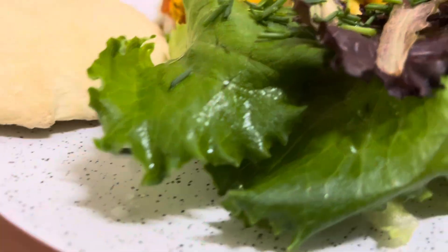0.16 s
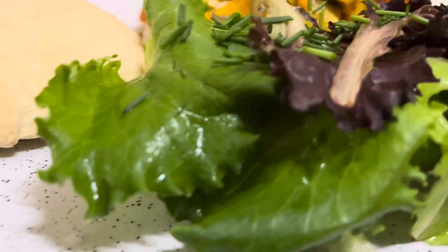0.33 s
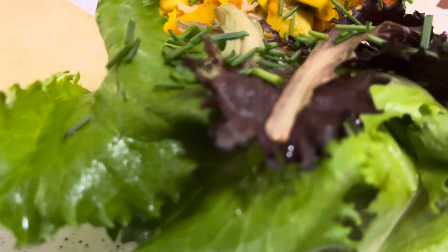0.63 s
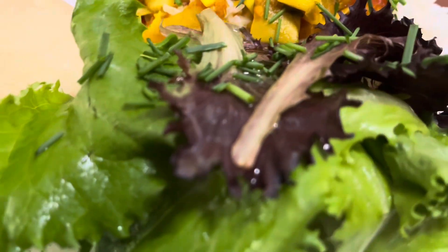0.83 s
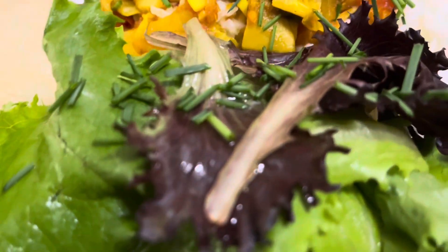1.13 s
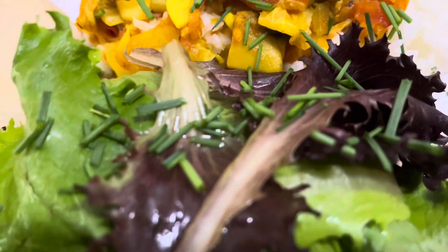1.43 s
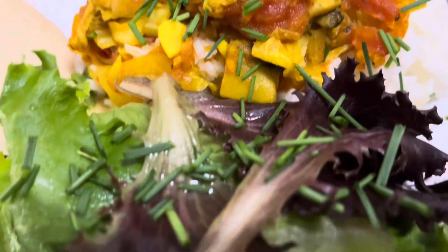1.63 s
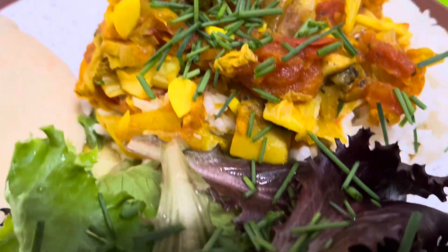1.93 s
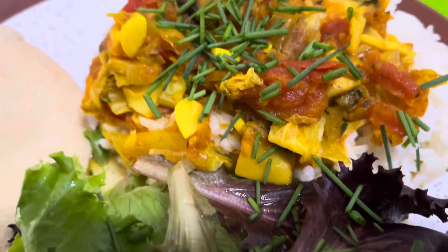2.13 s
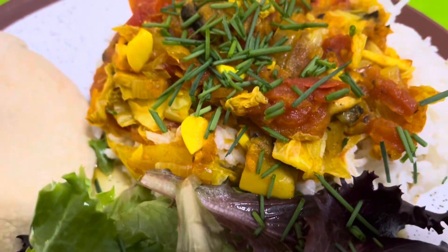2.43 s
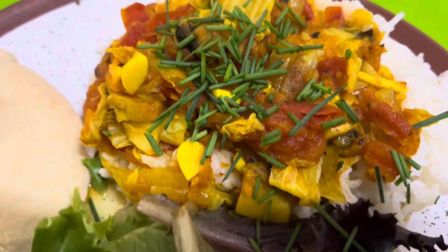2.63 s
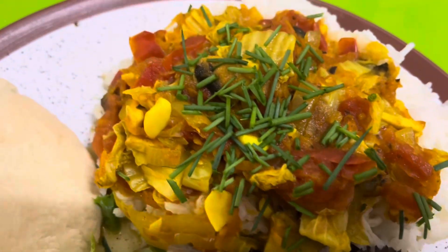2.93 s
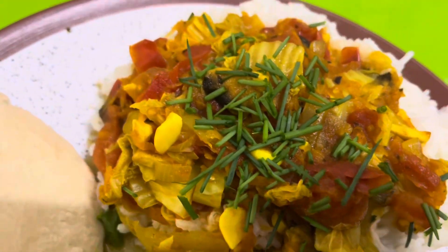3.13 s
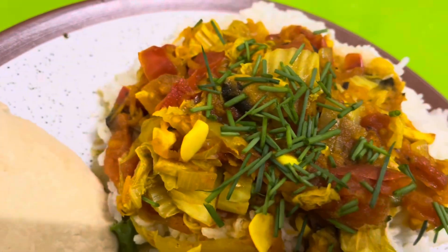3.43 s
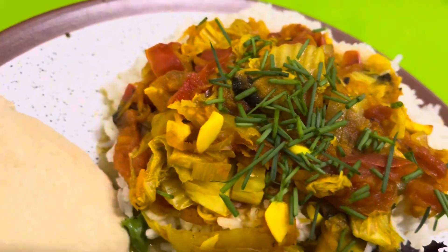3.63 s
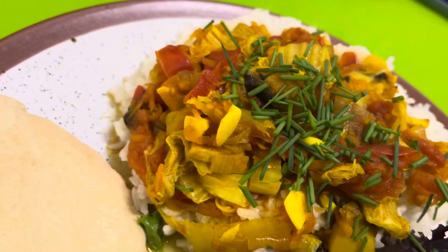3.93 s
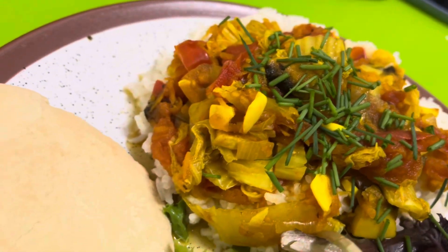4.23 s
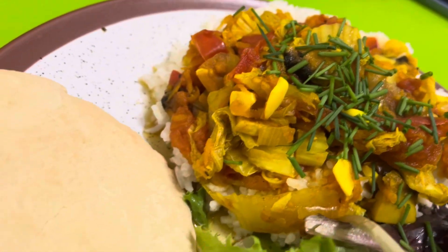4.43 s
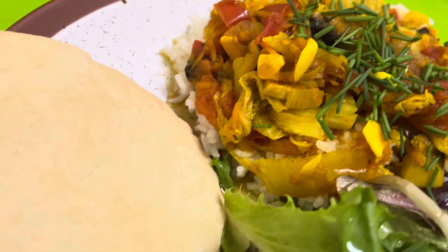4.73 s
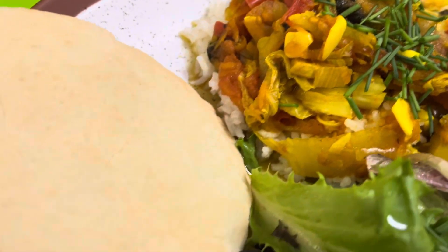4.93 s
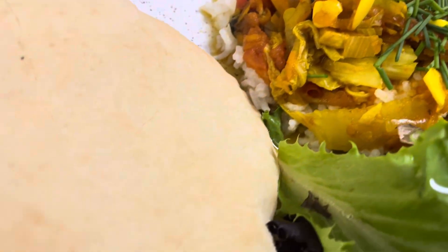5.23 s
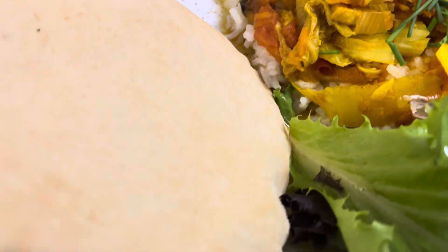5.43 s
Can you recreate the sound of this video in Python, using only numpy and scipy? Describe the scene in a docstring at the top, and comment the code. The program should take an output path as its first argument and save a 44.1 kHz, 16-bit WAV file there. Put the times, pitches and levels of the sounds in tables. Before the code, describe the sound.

Cutlery taps and dully knocks on china at irregular intervals, with one brief squeak across the glaze, over low steady room rumble and hiss.

```python
"""At a table in a small furnished room, cutlery meets china a little way from two microphone ports.
Taps excite the damped modes of a plate, and duller knocks those of a bowl, each with a noise burst.
Once an edge squeaks across the glaze by stick-slip, a harmonic series with lines at halves and quarters.
Diffuse echoes carry each sound for about a quarter second over a steady rumble and hiss of shaped noise."""
import sys
import numpy as np
from scipy import signal
from scipy.fft import rfft, irfft, next_fast_len
from scipy.io import wavfile
from scipy.ndimage import uniform_filter1d

SR = 44100
rng = np.random.default_rng(int(sys.argv[2]) if len(sys.argv) > 2 else 0)


def digitize_waveform(pressure):
    """Quantize a signal to 16-bit integers and store it at the path in sys.argv[1].

    Rows of a 2-D input are taken as channels; values are limited to [-1, 1].
    """
    field = np.atleast_2d(pressure).T
    bounded = np.clip(field, -1, 1)
    quanta = np.round(bounded * 32767).astype(np.int16)
    wavfile.write(sys.argv[1], SR, quanta)


N = 245501
SPAN = 20480  # samples given to each sound with its echoes

# Steady noise of the room, as the sum of the ports. Each row: frequency in Hz, relative density in dB.
HUM_SPECTRUM = [(12, -34), (20, -13.5), (65, 0), (210, -9), (301, -11), (422, -16.5), (558, -16.5),
                (897, -23), (1220, -29), (1440, -32.5), (5380, -44), (7730, -59), (8650, -67.5),
                (12100, -53.5), (16000, -100.5)]
# The same as the difference of the ports. Each row: frequency in Hz, relative density in dB.
WIDE_SPECTRUM = [(12, -36), (20, -10), (187, -7), (228, -3), (328, -4), (377, -2), (949, -6.5),
                 (1610, -13.5), (1810, -23), (4060, -26.5), (6720, -36.5), (7730, -27), (16000, -85.5)]
HUM_DB, WIDE_DB = -45, -54.5  # rms levels of sum and difference

# Decay of the room's echoes. Each row: frequency in Hz, time to fall 60 dB in seconds.
ROOM_T60 = [(500, 0.29), (2000, 0.25), (6000, 0.21), (14000, 0.16)]
# How alike the ports hear echoes. Each row: frequency in Hz, correlation from -1 to 1.
LIKENESS = [(100, -0.16), (300, .7), (640, 0.29), (1400, -0.093), (3000, 0.51), (6800, -0.6), (10000, 0.67),
            (15000, 0.13)]
BUILD_S, EARLY_DB, EARLY_T60_S = .003, 5.5, 0.094  # onset of the echoes; extra early part and its decay
EVEN_HZ = 30  # width of the stretches brought to equal energy
DIRECT_DB, WET_DB = -16.5, 3  # straight path and room, for taps and knocks

# Modes rung by the knocks. Each row: frequency in Hz, relative level in dB, free 60 dB decay in seconds.
BOWL_MODES = [(767, -12, 0.19), (1348, -1.5, 0.095), (1608, -5.5, 0.14), (1690, 4.5, 0.047),
              (1762, 4.5, 0.042), (2980, 3.5, 0.014), (4460, -6, 0.024)]
# Spectrum of contact noise. Each row: frequency in Hz, relative level in dB.
CRACK_SPECTRUM = [(300, -11.5), (800, -11), (1600, -8), (3000, -8), (5500, -5.5), (7500, -14.5),
                  (11000, -15.5), (13500, -26), (15500, -45.5)]
# Knocks, placed BUILD_S early. Each row: time in seconds, crack level in dB, left minus right in dB,
# ring level in dB, contact time in seconds, crack tilt in dB per octave.
KNOCKS = [(0.427, -29, 3, -45.5, 0.0082, -10.5), (1.365, -33, 5, -50, 0.0023, -4),
          (4.869, -11, 3, -24.5, 0.0029, -1.5), (4.895, -20, -1, -35, 0.0048, -4),
          (5.284, -31, 2, -50, 0.0041, -10.5)]
PUSH_S = 0.00032  # time constant with which a blow sets the china ringing

# Modes of the plate. Each row: frequency in Hz, relative level in dB, free 60 dB decay in seconds.
PLATE_MODES = [(1130, 3, 0.18), (1044, 5, 0.026), (1414, -3, 0.026), (1469, -3, 0.069), (1815, -0.5, 0.026),
               (1826, 0.5, 0.0494), (1890, 2.5, 0.028), (2290, -7, 0.035), (2834, 3, 0.04),
               (2901, 4.5, 0.056), (3014, -2, 0.053), (3490, 5.5, 0.019), (3620, 2.5, 0.019),
               (4120, -12, 0.03), (5070, -3.5, 0.067), (5146, 7, 0.079), (5154, -3.5, .04),
               (6500, -22, .04), (8130, -9, 0.12), (9350, -4.5, 0.018), (9900, -12, 0.046),
               (11030, 6.5, 0.036), (11190, -8.5, 0.15), (12670, -9, .05), (13350, -12, .04),
               (14650, -11, 0.0426)]
# How strongly a blow drives the plate, by named spot. Each row: frequency in Hz, relative level in dB.
SPOT_DRIVES = {"rim": [(1120, -1), (1400, -25.5), (1880, 0.5), (2850, 0.5), (3640, 2.5), (5100, -0.5),
               (11000, 1.5)], "edge": [(1120, -1.5), (1400, -10.5), (1880, -4), (2850, -7), (3640, -16),
               (5100, -4.5), (11000, -8.5)], "middle": [(1120, -22), (1400, 0), (1880, -34), (2850, -16),
               (3640, -37), (5100, -22), (11000, -42)]}
# Taps, placed BUILD_S early. Each row: time in seconds, spot struck, crack level in dB, ring level in dB,
# left minus right in dB, ring length as a share of the free plate's, treble tilt in dB per octave
# above TILT_HZ, extra level in dB of the glassy ring around GLASSY_HZ.
TAPS = [(0.929, "rim", -21.5, -35.5, 3, 0.83, 0.77, 3), (2.292, "rim", -15.5, -36, 2.5, 1.2, 0.1, 1),
        (2.663, "edge", -13.5, -40.5, 2.5, 1.66, 0.7, .3), (2.750, "edge", -13.5, -34.5, 1.5, 0.87, 1, -2),
        (3.314, "middle", -24, -20, -.3, 0.65, 1.4, -1.3), (3.329, "middle", -19.5, -20, 2, 0.24, -12, -5),
        (4.252, "rim", -16, -26.5, 2.5, 0.77, -0.7, -0.3), (5.276, "rim", -48.5, -41, 1, 0.21, -9, -9)]
TILT_HZ, TAP_CONTACT_S = 1980, 0.00079
GLASSY_HZ, GLASSY_OCTAVES = 5130, .15  # centre and half width

# Course of the squeak. Each row: time in seconds, slips per second in Hz, relative level in dB.
SQUEAK_COURSE = [(1.382, 1420, -62), (1.392, 1423, -21), (1.408, 1411, -11), (1.423, 1392, -18.5),
                 (1.465, 1386, -20.5), (1.481, 1411, -12.5), (1.503, 1425, -15), (1.522, 1440, -21),
                 (1.543, 1447, -33), (1.598, 1468, -43.5)]
# Overtones of the slips. Each row: multiple of the slip rate, relative level in dB.
OVERTONES = [(2, -16.5), (3, -23.5), (4, -21.5), (5, -38), (6, -31), (7, -41), (8, -58), (9, -57),
             (10, -69)]
# Lines of slips alternating by twos. Each row: multiple of the slip rate, relative level in dB.
HALVES = [(1.5, -23), (2.5, -17.5), (3.5, -24), (4.5, -48), (5.5, -35), (6.5, -50.5), (7.5, -48),
          (8.5, -61)]
# Lines of slips alternating by fours. Each row: multiple of the slip rate, relative level in dB.
QUARTERS = [(.75, -23.5), (1.25, -48), (1.75, -20.5), (2.25, -26), (2.75, -26.5), (3.25, -30), (3.75, -22),
            (4.25, -27), (4.75, -46), (6.75, -46), (7.25, -57)]
SQUEAK_PAN_DB, SQUEAK_LAG_S, SQUEAK_WET_DB, SQUEAK_WAVER_DB, GRIT_DB = -1.5, .000465, -3.5, 3.5, -14
# The edge bites hardest between these times in seconds: overtones rise, slips alternate, midway by fours.
BITE_S, FOURS_S = (1.424, 1.472), (1.435, 1.44)
OVERTONES_DB, BITE_DB, OVERTONES_AFTER_DB = -1.5, 6, -7  # BITE_DB is the rise during the bite
HALVES_DB, HALVES_AFTER_DB, FOURS_DB, FOURS_AFTER_DB = 2.5, -9.5, 4.5, -35
UNDERTONE_DB, UNDERTONE_GROWS_DB_S = -18, 44  # half the slip rate: keeps gaining after the bite
SETS_IN_DB_S, EASES_DB_S = 2302, 702  # how fast a regime comes and goes, dB per second

DIP_HZ, DIP_WIDTH_HZ, DIP_DB = 8545, 536, -22
TOP_HZ = 15800


def undb(db):
    """A level in dB is twenty times the logarithm of the amplitude ratio returned here."""
    return 10 ** (np.asarray(db) / 20)


def unit(x):
    """Dividing a signal by its root mean square gives it unit power."""
    return x / np.sqrt(np.mean(x ** 2))


def along(table, hz):
    """Interpolation on a log-frequency axis treats equal ratios of frequency equally."""
    at, value = np.transpose(table)
    return np.interp(np.log(np.maximum(hz, 1)), np.log(at), value)


def shaped(x, gain):
    """A linear filter multiplies the spectrum by a gain, a function of frequency in Hz."""
    size = x.shape[-1]
    hz = np.arange(size // 2 + 1) * SR / size
    return irfft(rfft(x) * gain(hz), size)


def walk(rate, size):
    """Slow fluctuation: random levels held 1 / rate seconds and slewed, with spread near 1."""
    hold = int(SR / rate)
    steps = np.repeat(rng.standard_normal(size // hold + 1), hold)
    return uniform_filter1d(steps, hold)[:size] * np.sqrt(3 / 2)


def hum():
    """Correlation of steady noise sets its width: the bass alike at both ports, the middle wide."""
    size = next_fast_len(N)
    mid = shaped(rng.standard_normal(size), lambda f: undb(along(HUM_SPECTRUM, f)))
    side = shaped(rng.standard_normal(size), lambda f: undb(along(WIDE_SPECTRUM, f)))
    mid = unit(mid)[:N] * undb(HUM_DB)
    side = unit(side)[:N] * undb(WIDE_DB)
    return np.array([mid + side, mid - side]) * undb(0.13 * walk(2.78, N))


def evened(x):
    """Spectral whitening: every stretch of EVEN_HZ in the returned spectrum has the same energy."""
    spectrum = rfft(x)
    energy = uniform_filter1d(abs(spectrum) ** 2, int(EVEN_HZ * SPAN / SR), axis=-1)
    return spectrum / np.sqrt(energy + 1e-18)


def echoes():
    """Diffuse reverberation as spectra for both ports: builds up fast, and the treble dies first."""
    t = np.arange(SPAN) / SR
    noise = rng.standard_normal((2, SPAN))
    tail = 0
    for hz in 250. * 2. ** np.arange(7):  # overlapping octave bands
        band = shaped(noise, lambda f: np.clip(1 - abs(np.log2(np.maximum(f, 1) / hz)), 0, 1))
        tail = tail + band * undb(-60 * t / along(ROOM_T60, hz))
    # table and nearest walls answer first and strongest
    build = 1 - np.exp(-(t / BUILD_S) ** 2)
    early = undb(EARLY_DB - 60 * t / EARLY_T60_S)
    tail = tail * build * (1 + early)
    mid = shaped(tail[0], lambda f: np.sqrt(1 + along(LIKENESS, f)))
    side = shaped(tail[1], lambda f: np.sqrt(1 - along(LIKENESS, f)))
    return evened(np.array([mid + side, mid - side]))


def place(out, s, sound, pan_db, direct_db, wet_db, lag_s=0.):
    """Superposition of a straight path, later at the right by lag_s, and convolution with fresh echoes."""
    direct = np.array([sound, np.roll(sound, int(lag_s * SR))])
    wet = irfft(rfft(sound) * echoes(), SPAN)
    heard = undb(direct_db) * direct + undb(wet_db) * wet
    heard = heard * undb([[pan_db / 2], [-pan_db / 2]])
    heard = heard * np.clip(np.linspace(2, -.5, SPAN), 0, 1)  # fade out the end
    i = int(s * SR)
    out[:, i:i + SPAN] += heard[:, :out.shape[1] - i]


def ring(modes, drive_db, free=0.67):
    """Modal superposition: damped sines start together, each detuned slightly at random."""
    t = np.arange(SPAN) / SR
    hz, db, t60 = np.transpose(modes)[:, :, None]
    detune, level_chance = rng.standard_normal((len(modes), 2)).T[:, :, None]
    sines = np.sin(2 * np.pi * hz * (1 + .001 * detune) * t)
    start_db = db + drive_db(hz) + 2.44 * level_chance
    decaying = undb(start_db - 60 * t / (free * t60)) * sines
    return np.sum(decaying, axis=0) * (1 - np.exp(-t / PUSH_S))


def crack(db, contact_s, tilt_db):
    """Impact noise: a burst shaped by the contact time, then whitened and coloured."""
    t = np.arange(SPAN) / SR
    envelope = t / contact_s * np.exp(1 - t / contact_s)  # peaks at contact_s
    burst = irfft(evened(rng.standard_normal(SPAN) * envelope), SPAN) * np.sqrt(contact_s * SR)
    colour = lambda f: undb(along(CRACK_SPECTRUM, f) + tilt_db * np.log2(np.maximum(f, 800) / 2000))
    return undb(db) * shaped(burst, colour)


def knock(crack_db, ring_db, contact_s, tilt_db):
    """A dull impact drives all bowl modes by the same level and adds its contact noise."""
    return ring(BOWL_MODES, lambda f: ring_db) + crack(crack_db, contact_s, tilt_db)


def tap(spot, crack_db, ring_db, free, tilt_db, glassy_db):
    """The point of impact decides how strongly each plate mode is driven."""
    def drive_db(f):
        """Modal drive is the spot's response plus a treble tilt and a glassy band."""
        treble_db = tilt_db * np.log2(np.maximum(f / TILT_HZ, 1))
        glassy = abs(np.log2(f / GLASSY_HZ)) < GLASSY_OCTAVES
        return ring_db + along(SPOT_DRIVES[spot], f) + treble_db + glassy_db * glassy

    return ring(PLATE_MODES, drive_db, free) + crack(crack_db, TAP_CONTACT_S, 0)


def regime(t, span_s, before_db, top_db, after_db):
    """Regime change: a level climbs to top_db at the span's start and sinks to after_db past its end."""
    rise = np.maximum(top_db - SETS_IN_DB_S * np.maximum(span_s[0] - t, 0), before_db)
    fall = rise - EASES_DB_S * np.maximum(t - span_s[1], 0)
    return np.maximum(fall, np.minimum(rise, after_db))


def squeak():
    """Stick-slip locked to a plate mode; period doubling of the slips adds lines at halves and quarters."""
    s, slip_hz, level_db = np.transpose(SQUEAK_COURSE)
    t = s[0] + np.arange(SPAN) / SR
    hz, db = np.interp(t, s, slip_hz), np.interp(t, s, level_db)
    over_db = regime(t, BITE_S, OVERTONES_DB, OVERTONES_DB + BITE_DB, OVERTONES_AFTER_DB)
    half_db = regime(t, BITE_S, -40, HALVES_DB, HALVES_AFTER_DB)
    under_db = regime(t, BITE_S, -55, UNDERTONE_DB, UNDERTONE_DB)
    under_db = under_db + UNDERTONE_GROWS_DB_S * (t - BITE_S[0])
    quarter_db = regime(t, FOURS_S, -50, FOURS_DB, FOURS_AFTER_DB)
    phase = 2 * np.pi * np.cumsum(hz * (1 + .004 * walk(200, SPAN))) / SR
    grit = shaped(rng.standard_normal(SPAN), lambda f: undb(along(CRACK_SPECTRUM, f)))
    out = undb(GRIT_DB + half_db) * grit
    families = (([(1, 0.014)], 0), ([(.5, 0)], under_db), (OVERTONES, over_db),
                (HALVES, half_db), (QUARTERS, quarter_db))
    for partials, share_db in families:
        for multiple, part_db in partials:
            waver_db = SQUEAK_WAVER_DB * min(multiple, 1) * walk(108.4, SPAN)
            sine = np.sin(multiple * phase + 2 * np.pi * rng.random())
            out = out + undb(part_db + share_db + waver_db) * sine
    return out * np.sqrt(2) * undb(db) * (t < s[-1])


def scene():
    """Superposition: hum, knocks, taps and squeak add linearly at the two ports."""
    out = hum()
    for s, crack_db, pan_db, ring_db, contact_s, tilt_db in KNOCKS:
        sound = knock(crack_db, ring_db, contact_s, tilt_db)
        place(out, s - BUILD_S, sound, pan_db, DIRECT_DB, WET_DB)
    for s, spot, crack_db, ring_db, pan_db, free, tilt_db, glassy_db in TAPS:
        sound = tap(spot, crack_db, ring_db, free, tilt_db, glassy_db)
        place(out, s - BUILD_S, sound, pan_db, DIRECT_DB, WET_DB)
    place(out, SQUEAK_COURSE[0][0], squeak(), SQUEAK_PAN_DB, 0, SQUEAK_WET_DB, SQUEAK_LAG_S)
    return out


def record(dry):
    """Overall tone by linear filtering: a narrow dip near 8.5 kHz, and nothing above about 16 kHz."""
    size = next_fast_len(N)
    padded = np.pad(dry, ((0, 0), (0, size - N)))
    dip = lambda f: undb(DIP_DB * np.exp(-((f - DIP_HZ) / DIP_WIDTH_HZ) ** 4))
    dipped = shaped(padded, dip)[:, :N]
    low_pass = signal.ellip(10, .2, 80, TOP_HZ, fs=SR, output="sos")
    return signal.sosfilt(low_pass, dipped)


dry = scene()
out = record(dry)
digitize_waveform(out)
```